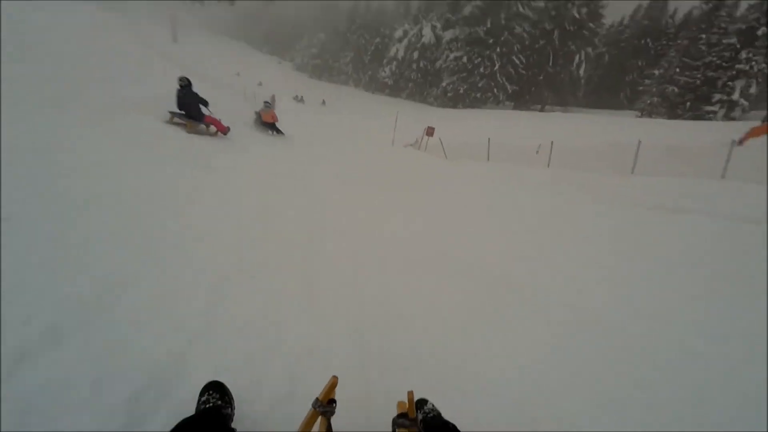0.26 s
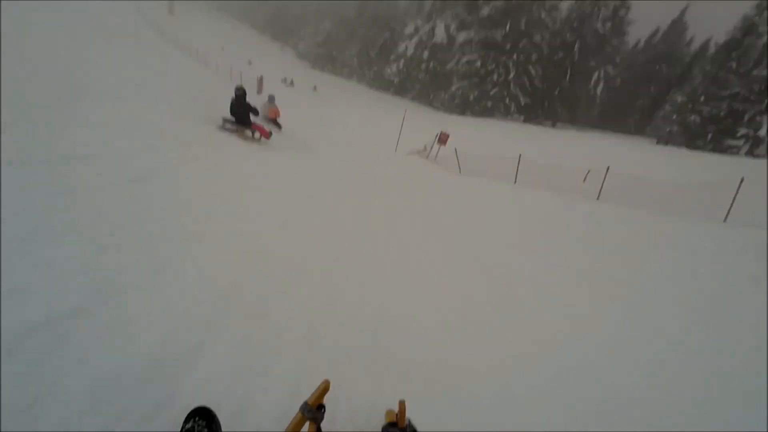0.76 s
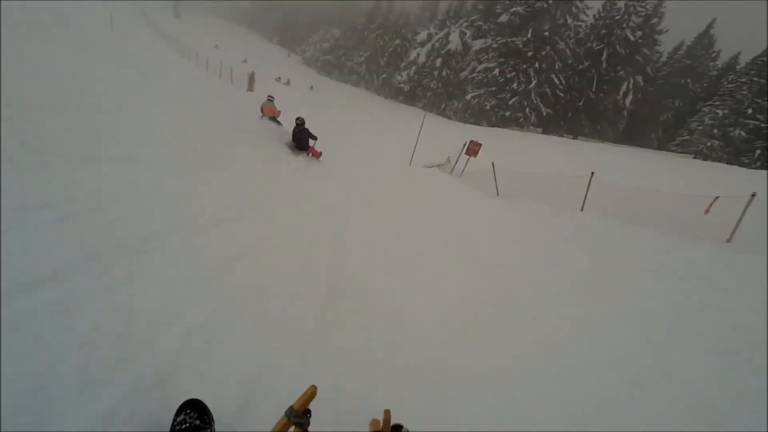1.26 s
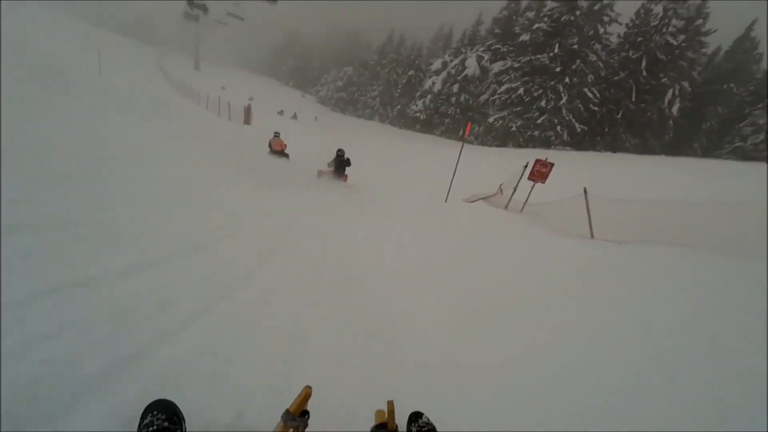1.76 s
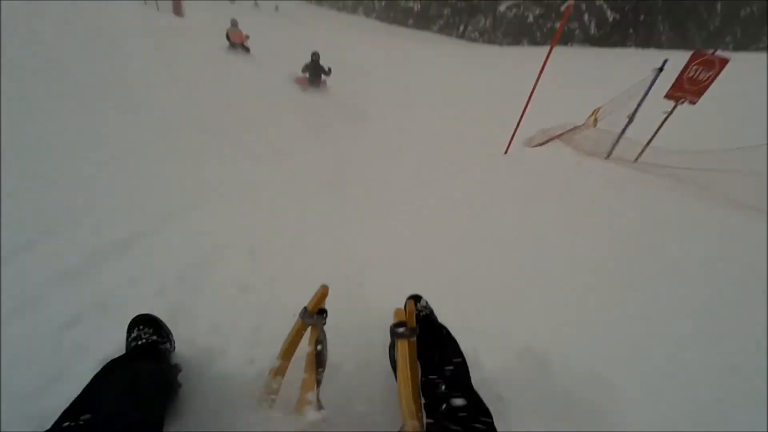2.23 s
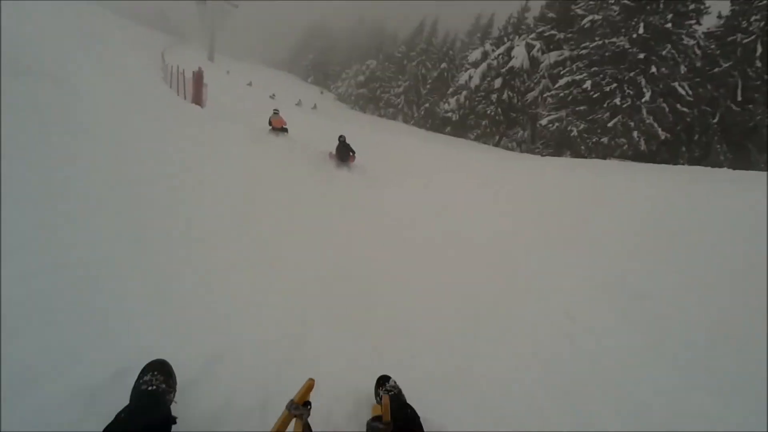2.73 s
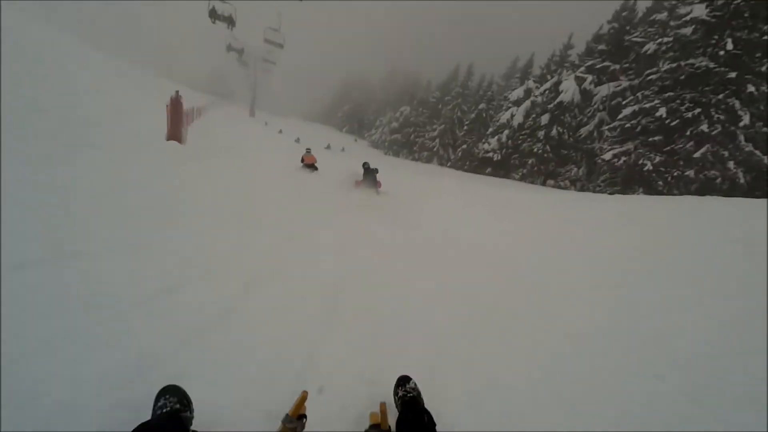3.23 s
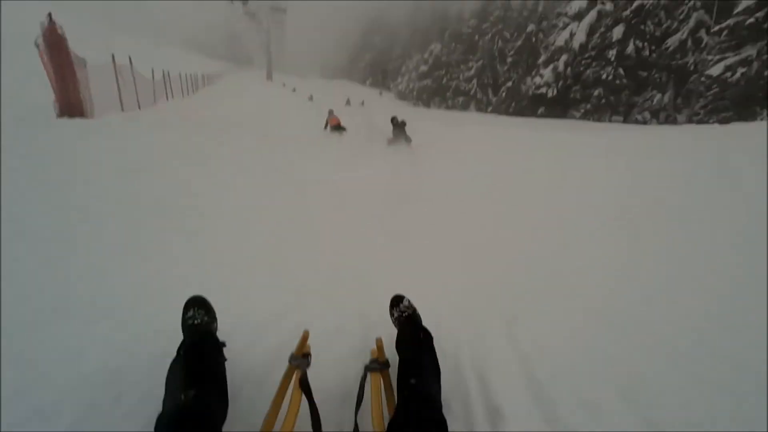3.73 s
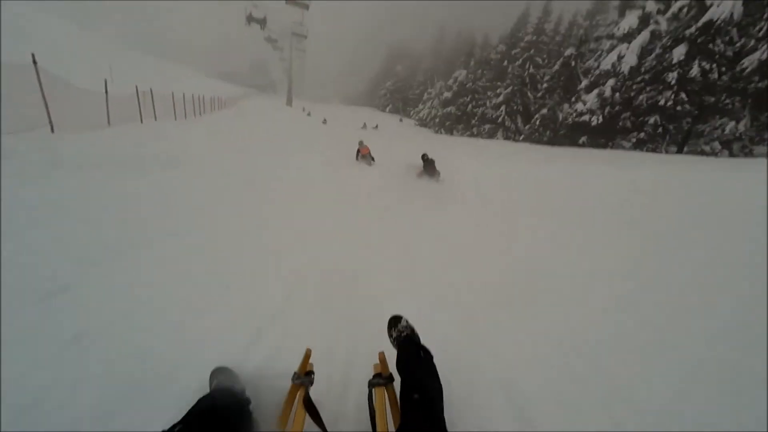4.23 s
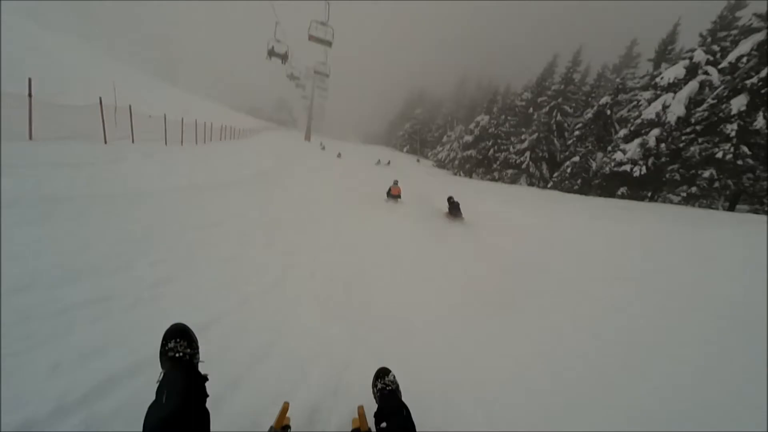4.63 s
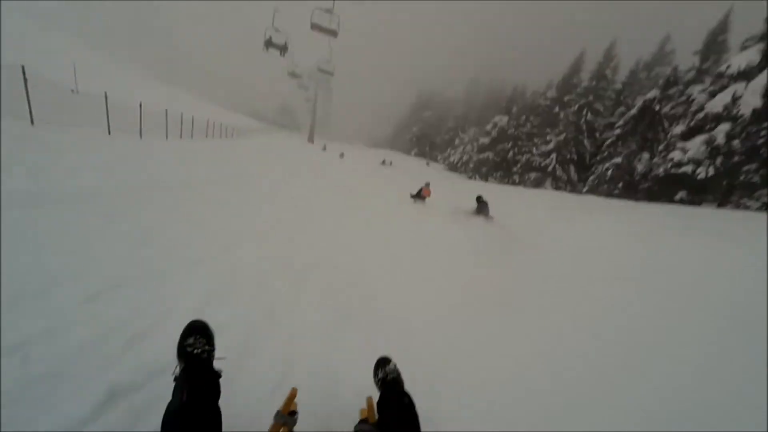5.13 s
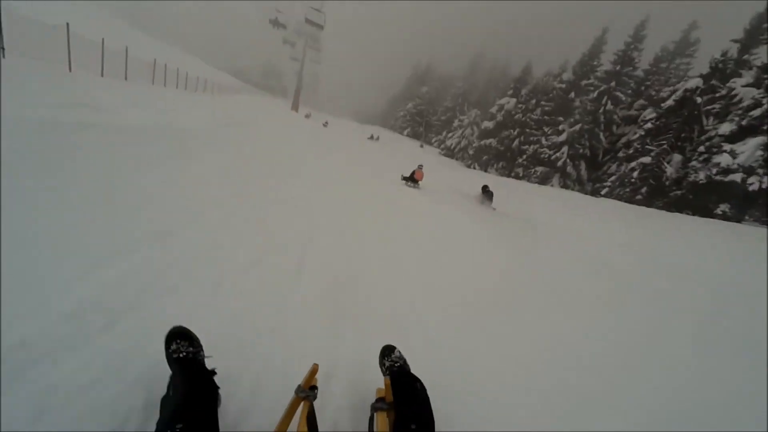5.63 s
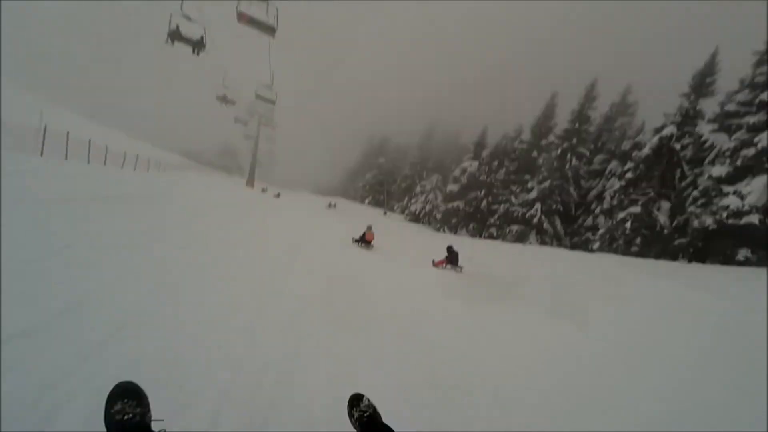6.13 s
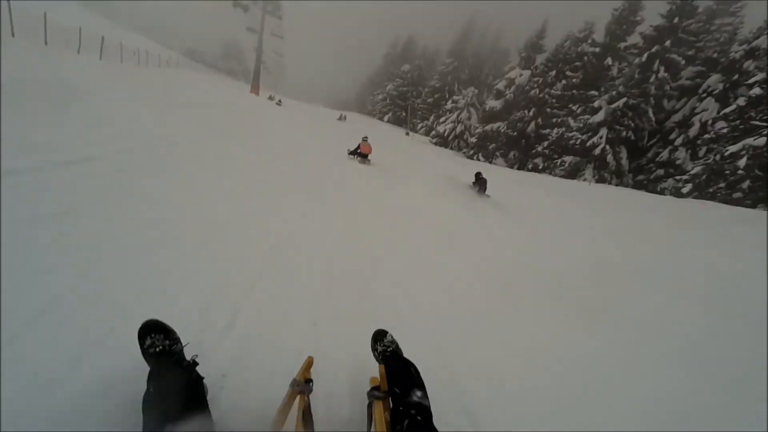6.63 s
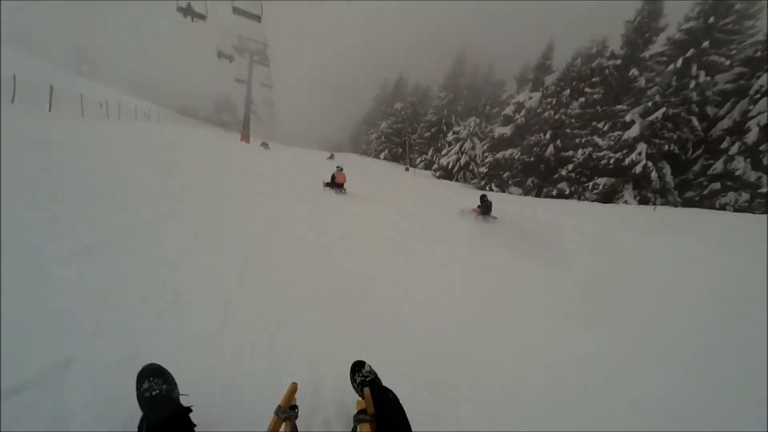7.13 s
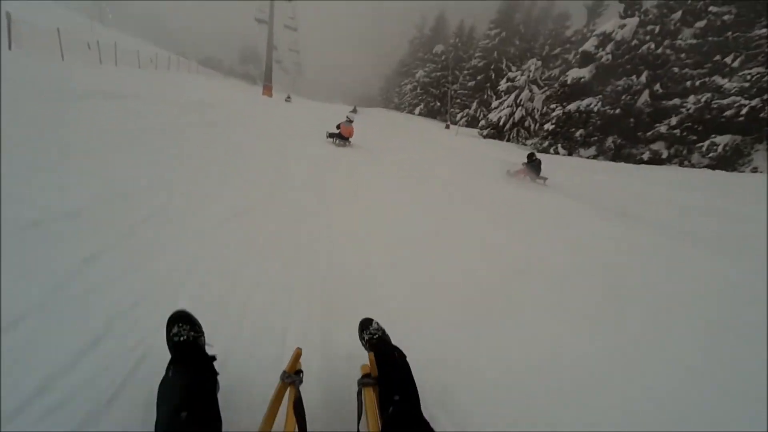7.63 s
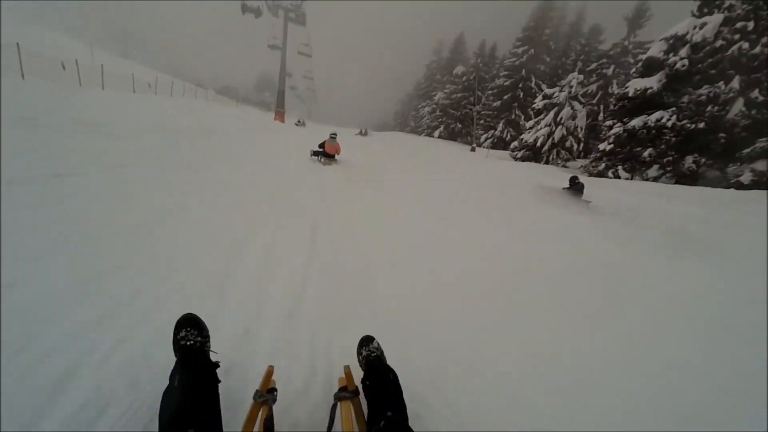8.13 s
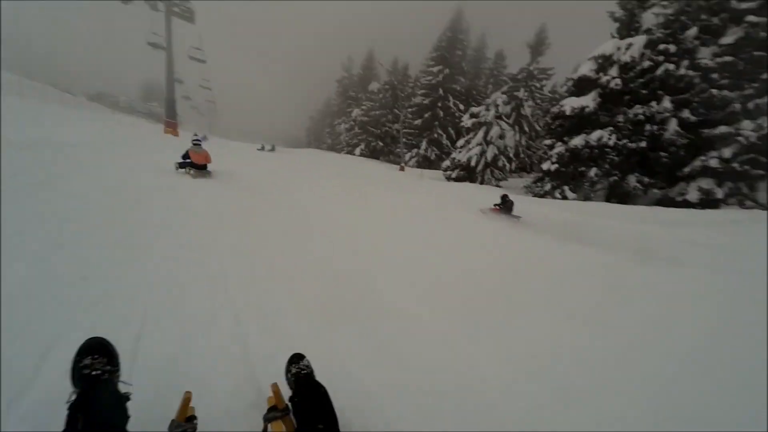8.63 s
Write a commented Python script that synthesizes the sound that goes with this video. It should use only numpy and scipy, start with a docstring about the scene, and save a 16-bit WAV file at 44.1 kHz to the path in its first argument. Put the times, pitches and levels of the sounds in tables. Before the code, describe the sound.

Runners scrape steadily down a snowy slope, muffled and grainy, over low shuddering rumble, with bursts of thuds and wooden knocks.

```python
"""The runners of a wooden sled grind down packed snow, heard inside a closed case that the rider wears.
Breaking crystals act as random impulses that excite the case resonances: a grainy hiss over a coarser grind.
Heels and edges throw up sprays of fine grains. Bumps thud as decaying low modes with a rattle of slats;
knocks ring the wooden frame and crack. Icy crumbs tick on the case as short noise bursts.
Beneath lies the ride: low filtered noise that sways and rumbles, and a hollow drone of the frame."""
import sys
import numpy as np
from scipy.fft import rfft, irfft, next_fast_len
from scipy.io import wavfile
from scipy.ndimage import uniform_filter1d, map_coordinates

SR = 44100
rng = np.random.default_rng(int(sys.argv[2]) if len(sys.argv) > 2 else 0)


def to_wav(s):
    """Save 16-bit WAV."""
    ch = np.atleast_2d(s).T  # columns
    pcm = np.round(np.clip(ch, -1, 1) * 32767)  # PCM
    wavfile.write(sys.argv[1], SR, pcm.astype(np.int16))


N = 391166  # length in samples

# Spectra give relative levels per hertz: each coloured noise is afterwards brought to rms 1.

# unevenness of the track: start_s, level_db
TRACK_UNEVENNESS = [(0, -19.5), (.55, -24), (1.05, -12), (1.4, -15.5), (1.75, -25), (2.05, -18.5),
                    (2.45, -25.5), (2.9, -17), (3.55, -19.5), (4.1, -12), (4.65, -27), (5.0, -15),
                    (5.45, -11.5), (5.7, -22), (6.2, -14), (6.6, -21.5), (7.15, -20.5), (8.0, -22.5),
                    (8.87, -26)]
# spectrum of the sway: frequency_hz, relative_level_db
SWAY_SPECTRUM = [(1, -42.5), (4, -15), (7, 1.5), (10, -5), (16, -17.5), (25, -45.5), (45, -32.5),
                 (100, -55.5), (300, -120)]
# spectrum of the rumble: frequency_hz, relative_level_db
RUMBLE_SPECTRUM = [(10, 1.5), (24, 15.5), (32, 15), (44, -7), (60, -9), (77, -3), (98, 6), (120, -3.5),
                   (150, -13), (280, -35.5), (2000, -66)]
# spectrum of the hollow drone of the wooden frame: frequency_hz, relative_level_db
DRONE_SPECTRUM = [(90, -11), (150, 3), (215, 4), (290, 0), (440, -4), (560, 2), (720, -3), (1100, -12),
                  (3000, -46)]
# icy crumbs on the case: start_s, relative_level_db
CRUMBS = [(.975, -38), (1.3897, -41), (1.4492, -34.5), (1.8956, -46), (2.1071, -49), (2.3046, -43),
          (3.195, -43), (3.8723, -41.5), (4.8866, -44.5), (5.0507, -46), (5.556, -44), (6.4296, -44),
          (6.6697, -36), (6.9443, -35), (7.9264, -40), (8.0701, -40), (8.1917, -34)]
# spectrum of an ice tick, before its random variation: frequency_hz, relative_level_db
ICE_SPECTRUM = [(1500, -48), (4000, 7), (7000, 7.5), (9500, 3.5), (12500, -2), (15500, -3)]
# bumps under the runners: start_s, thud_gain_db, rattle_gain_db
BUMPS = [(.85, -21.5, -25.5), (1.032, -28, -34), (1.112, -25, -21.5), (1.141, -20, -48), (3.421, -24, -26),
         (3.435, -13, -38), (3.714, -27.5, -34), (4.01, -25, -26), (4.08, -29, -24), (5.268, -27, -35),
         (5.335, -26, -27), (5.424, -23, -58), (5.481, -24.5, -48), (6.164, -27.5, -44)]
# low modes of sled and rider, before detuning: pitch_hz, relative_level_db, t60_s
LOW_MODES = [(35.6, 6.5, 0.13), (73.6, 5.5, 0.09), (97.3, -5.5, 0.16), (181, -12, 0.05)]
# spectrum of the shaken slats: frequency_hz, relative_level_db
RATTLE_SPECTRUM = [(60, -14), (130, -3), (210, -6), (340, -7), (520, 7.5), (750, -9), (1300, -2),
                   (3000, -8), (8000, -55)]
# hard contacts of the frame: start_s, gain_db, hardness_centre_hz, crack_gain_db
KNOCKS = [(1.1207, -26.5, 805, -48), (3.4166, -19, 1100, -45), (3.4196, -13, 3400, -17),
          (3.4217, -27, 3200, -37), (3.428, -18, 1300, -39), (3.474, -33, 1600, -52),
          (3.713, -33, 700, -57), (3.995, -28, 2000, -36), (4.0025, -30, 1700, -45),
          (4.0205, -20, 4200, -32), (4.0243, -30, 3600, -42), (4.0686, -29.5, 600, -55),
          (4.085, -33, 1800, -46), (4.097, -32, 700, -52), (5.272, -33, 450, -60)]
# modes of the wooden frame, before detuning: pitch_hz, relative_level_db, t60_s
WOOD_MODES = [(195, 2.5, 0.034), (370, -9, 0.023), (524, -6, 0.017), (796, -3, 0.012), (960, -3.5, 0.017),
              (1276, 0.5, 0.056), (1560, -5, 0.028), (2010, -2, 0.013), (2110, 6, 0.027), (2400, -1, 0.013),
              (2910, 1.5, 0.019), (3490, -1, 0.021), (4340, -7, 0.015), (7140, -10, .007)]
# the frame's many small modes, too dense to tell apart: frequency_hz, relative_level_db
CLATTER_SPECTRUM = [(300, -16), (800, -6.5), (1400, -4.5), (2500, -3), (3300, -5), (5000, -15), (9000, -45)]
# spectrum of a knock's crack: frequency_hz, relative_level_db
CRACK_SPECTRUM = [(300, -3), (1500, -21), (4000, 12), (7000, -4), (11000, -11), (15500, -24)]
# snow thrown up by a heel or an edge, before flutter: peak_s, rise_s, fall_s, peak_level_db
SPRAYS = [(1.19, 0.048, 0.19, -51), (1.7, 0.097, .15, -52), (2.13, .11, 0.051, -47),
          (2.755, 0.062, .11, -41), (2.915, 0.066, 0.022, -44.5), (3.775, 0.24, 0.036, -49.5),
          (4.015, 0.036, 0.03, -49), (4.76, 0.11, 0.22, -52.5), (5.795, 0.088, 0.067, -42.5)]
# spectrum of the thrown grains, before the case: frequency_hz, relative_level_db
POWDER_SPECTRUM = [(500, -21), (1500, -11), (3500, 0), (6000, 6.5), (7500, 0), (10000, -1), (11500, -4.5),
                   (15000, -7)]
# pressure and speed of the runners, before crests and ripples: start_s, grind_level_db, hiss_level_db
GLIDE = [(0, -44, -49), (.85, -42.5, -44.5), (1.27, -40, -41.5), (1.55, -42.5, -45), (2.05, -39, -41),
         (2.35, -44.5, -49), (2.85, -45.5, -49.5), (3.1, -41.5, -44.5), (3.7, -42.5, -46), (4.55, -44, -49),
         (5.2, -39, -41.5), (5.9, -41, -43.5), (6.28, -38, -39), (6.65, -41, -42.5), (7.17, -38, -38.5),
         (7.75, -41.5, -46.5), (8.38, -41, -43.5), (8.6, -42.5, -57.5), (8.87, -43, -45.5)]
# the sled goes light over a crest and the runners lose grip: centre_s, length_s, hiss_drop_db
CRESTS = [(.79, 0.14, 4), (1.093, 0.085, 8), (1.93, 0.2, 5), (2.4, 0.18, 4.5), (2.638, 0.069, 5.5),
          (2.96, 0.063, 2.5), (3.182, 0.13, 4), (3.428, 0.11, 8.5), (3.562, .07, 9), (3.816, 0.14, 6),
          (4.045, 0.081, 8), (4.28, 0.098, 3.5), (4.937, 0.058, 4.5), (8.02, 0.11, 2.5)]
# spectrum of the grinding, before the case: frequency_hz, relative_level_db
GRIND_SPECTRUM = [(300, -15), (550, -11.5), (760, -3), (1100, 3), (1700, -6.5), (2400, -1.5), (3500, -13),
                  (6000, -14), (16000, -50)]
# spectrum of the bright hiss, before the case: frequency_hz, relative_level_db
HISS_SPECTRUM = [(600, -7.5), (1500, -13.5), (2400, -5), (3100, -3.5), (3800, 1.5), (4220, -4.5),
                 (5000, -3), (5700, -4.5), (6600, -15.5), (7800, -16), (9600, -13.5), (11000, -22.5),
                 (15500, -25)]
# resonances of the closed case at full share: centre_hz, width_hz, lift_db
CASE_RESONANCES = [(1007.5, 39.6, 10), (993, 193, 12), (1309, 150, 10.5), (1584, 26, 8.5), (1930, 720, 8),
                   (2722, 370, 7.5), (3405, 457, 14), (3812, 356, 11), (4470, 140, 8), (5910, 600, 3),
                   (7140, 280, 7.5)]

SWAY_DB = -0.5  # added to the unevenness
RUMBLE_DB, RUMBLE_GROWTH = -38.5, 0.44  # on average ground; dB per dB of unevenness
DRONE_DB, DRONE_GROWTH = -55.5, 0.65  # at average grinding; dB per dB of grinding
THUD_RISE_S, RATTLE_RISE_S, RATTLE_T60_S = 0.0062, 0.012, 0.053
CLATTER_DB, CLATTER_T60_S = -8, 0.022  # beside the ringing modes
SPRAY_FADE_DB = 18.5  # fall in level over one rise or fall time
DUST_DB, DUST_GROWTH = -63, 0.26  # at average hiss off the crests; dB per dB of hiss
CREST_GRIND_SHARE = 0.91  # the grinding drops less than the hiss
FADE_IN_S, TOP_HZ = 0.002, 15500


def amp(db):
    """Level to gain: twenty decibels are a factor of ten in amplitude."""
    return 10 ** (np.asarray(db) / 20)


def unit(x):
    """Normalisation: scale x to rms 1."""
    return x / np.sqrt(np.mean(x ** 2) + 1e-20)


def along(points, hz):
    """Interpolation of a spectrum on a logarithmic frequency axis."""
    f, v = np.transpose(points)
    return np.interp(np.log(hz + 1), np.log(f + 1), v)


def curves(rows):
    """Linear interpolation in time: one value per sample for each column after the first."""
    s, *columns = np.transpose(rows)
    times = np.arange(N) / SR
    return [np.interp(times, s, column) for column in columns]


def wobble(rate):
    """Band-limited fluctuation: a smooth curve through random knots, rate of them a second."""
    knots = rng.standard_normal(4096)
    return map_coordinates(knots, [np.arange(N) * rate / SR], mode="wrap")


def filtered(x, response):
    """Linear filtering: the spectrum of x is multiplied by a response of frequency."""
    m = next_fast_len(len(x) + SR // 10)
    spectrum = rfft(x, m) * response(np.fft.rfftfreq(m, 1 / SR))
    return irfft(spectrum, m)[:len(x)]


def case_lift(f):
    """Resonance: each mode of the case lifts a bell of frequencies around its centre, in dB."""
    return sum(db / (1 + (2 * (f - hz) / width) ** 2) for hz, width, db in CASE_RESONANCES)


def coloured(x, spectrum, ring=0):
    """Source and resonator: x takes a spectrum and a share of the case's lift, at rms 1."""
    def response(f):
        lift_db = ring * case_lift(f) if ring else 0
        return amp(along(spectrum, f) + lift_db)
    return unit(filtered(x, response))


def steady(x, seconds):
    """Envelope flattening: x is divided by its running rms."""
    power = uniform_filter1d(x ** 2, max(int(seconds * SR), 1))
    return x / np.sqrt(np.abs(power) + 1e-9)


def crystals(per_second, spread_db):
    """Shot noise: snow crystals break at random instants with impulses of random size."""
    breaks = rng.random(N) < per_second / SR
    sizes = rng.standard_normal(N) * amp(spread_db * rng.standard_normal(N))
    return unit(breaks * sizes)


def add(track, s, sound):
    """Superposition: mix a sound into the track at s seconds."""
    part = track[max(round(s * SR), 0):][:len(sound)]
    part += sound[:len(part)]


def unloading():
    """Loss of contact force: a smooth dip in decibels over each crest."""
    t = np.arange(N) / SR
    return sum(drop_db * np.exp(-(2 * (t - s) / length) ** 2) for s, length, drop_db in CRESTS)


def ride():
    """Forced vibration: uneven ground drives a sway near 7 Hz and a rumble; grinding drives the drone."""
    uneven_db, = curves(TRACK_UNEVENNESS)
    grind_db = curves(GLIDE)[0] - CREST_GRIND_SHARE * unloading()
    rumble_db = RUMBLE_DB + RUMBLE_GROWTH * (uneven_db - uneven_db.mean())
    drone_db = DRONE_DB + DRONE_GROWTH * (grind_db - grind_db.mean())
    lumps = wobble(18)
    sway = steady(coloured(rng.standard_normal(N), SWAY_SPECTRUM), 0.15)
    rumble = steady(coloured(rng.standard_normal(N), RUMBLE_SPECTRUM), 0.152)
    drone = steady(coloured(rng.standard_normal(N), DRONE_SPECTRUM), 0.22)
    return (sway * amp(uneven_db + SWAY_DB)
            + rumble * amp(rumble_db + 1.5 * lumps)
            + drone * amp(drone_db + 0.54 * lumps))


def crumbs():
    """Light impact: bits of ice hit the case, each a decaying noise tick of its own colour."""
    out, t = np.zeros(N), np.arange(SR // 40) / SR
    for s, db in CRUMBS:
        spectrum = [(hz, level + 3 * rng.standard_normal()) for hz, level in ICE_SPECTRUM]
        tick = steady(coloured(rng.standard_normal(len(t)), spectrum), 0.00053)
        add(out, s, tick * amp(db + 2.0 - 60 * t / 0.0078))
    return out


def bumps():
    """Impulse response: each bump sets the low modes of the sled decaying and shakes its slats."""
    out, t = np.zeros(N), np.arange(SR // 4) / SR
    for s, thud_db, rattle_db in BUMPS:
        thud = np.zeros(len(t))
        for hz, db, t60 in LOW_MODES:
            detune = 1 + 0.038 * rng.standard_normal()
            thud += amp(db - 60 * t / t60) * np.sin(2 * np.pi * hz * detune * t)
        thud *= 1 - np.exp(-t / THUD_RISE_S)
        rattle = steady(coloured(rng.standard_normal(len(t)), RATTLE_SPECTRUM), 0.035)
        rattle *= amp(-60 * t / RATTLE_T60_S) * (1 - np.exp(-t / RATTLE_RISE_S))
        # the thud begins with a negative swing
        add(out, s, amp(rattle_db) * rattle - amp(thud_db) * thud)
    return out


def knocks():
    """Modal impact: the loose frame takes up its play; harder contacts excite higher modes."""
    out, t = np.zeros(N), np.arange(SR // 8) / SR
    hz, mode_db, t60 = np.transpose(WOOD_MODES)[:, :, None]
    for s, db, centre_hz, crack_db in KNOCKS:
        def reach(f):
            return (f / centre_hz) ** 0.5 / (1 + (f / centre_hz) ** 3)

        gain = reach(hz) * amp(mode_db + 1.5 * rng.standard_normal(hz.shape))
        detune = 1 + 0.01 * rng.standard_normal(hz.shape)
        phase = 2 * np.pi * rng.random(hz.shape)
        modes = gain * amp(-60 * t / t60) * np.sin(2 * np.pi * hz * detune * t + phase)
        ring = np.sum(modes, axis=0) / np.linalg.norm(gain)
        struck = filtered(rng.standard_normal(len(t)), reach)
        clatter = steady(coloured(struck, CLATTER_SPECTRUM), 0.0053)
        clatter *= amp(CLATTER_DB - 60 * t / CLATTER_T60_S)
        crack = steady(coloured(rng.standard_normal(len(t)), CRACK_SPECTRUM), 0.0017)
        crack *= amp(-60 * t / 0.0078)
        attack = 1 - np.exp(-t / 0.00029)
        add(out, s, (amp(db) * (ring + clatter) + amp(crack_db) * crack) * attack)
    return out


def spray():
    """Addition of powers: powder shed by the runners and clumps cut by heels and edges share one grain noise."""
    t = np.arange(N) / SR
    hiss_db = curves(GLIDE)[1]
    dust_db = DUST_DB + DUST_GROWTH * (hiss_db - hiss_db.mean() - unloading())
    power = amp(dust_db) ** 2
    for s, rise, fall, db in SPRAYS:
        distance = np.maximum((s - t) / rise, (t - s) / fall)
        power = power + amp(db - SPRAY_FADE_DB * distance) ** 2
    grains = coloured(crystals(per_second=3600, spread_db=2.5), POWDER_SPECTRUM, ring=0.44)
    flutter_db = 2.36 * wobble(130) + 1.4 * wobble(16)
    return grains * np.sqrt(power) * amp(flutter_db)


def runners():
    """Fracture noise: crushed snow excites the case; crests, waves and ripples of the track modulate it."""
    grind_db, hiss_db = curves(GLIDE)
    lost_db, ripple, waves = unloading(), wobble(28), wobble(11)
    grind = coloured(crystals(per_second=9000, spread_db=0.0), GRIND_SPECTRUM, ring=0.96)
    grind = steady(grind, 0.16)
    hiss = coloured(crystals(per_second=7000, spread_db=0.5), HISS_SPECTRUM, ring=1)
    grind_db = grind_db - CREST_GRIND_SHARE * lost_db + 0.63 * ripple + 0.5 * waves
    hiss_db = hiss_db - lost_db + 1.44 * ripple + 0.5 * waves
    return grind * amp(grind_db) + hiss * amp(hiss_db)


def scene():
    """Superposition of all sources; the closed case gives both channels the same sound."""
    mono = ride() + crumbs() + bumps() + knocks() + spray() + runners()
    return np.array([mono, mono])


def record(dry):
    """Band limiting: a brief fade-in, then nothing passes from the top frequency upward."""
    opening = np.sin(np.pi / 2 * np.minimum(np.arange(N) / SR / FADE_IN_S, 1))
    return np.array([filtered(channel * opening, lambda hz: hz < TOP_HZ) for channel in dry])


dry = scene()
out = record(dry)
to_wav(out)
```